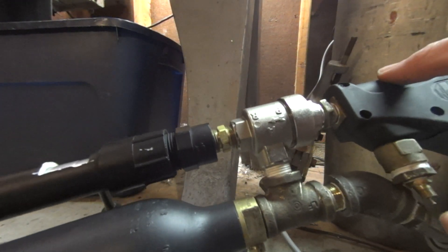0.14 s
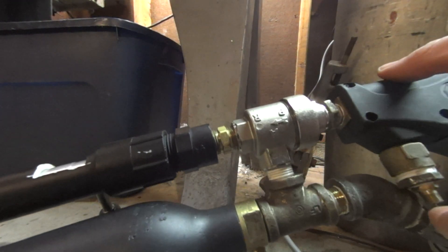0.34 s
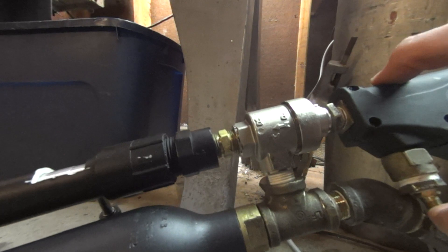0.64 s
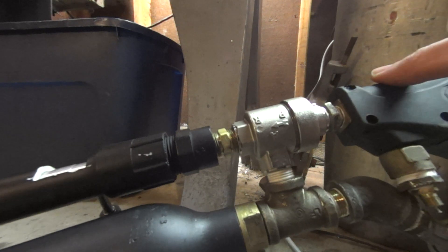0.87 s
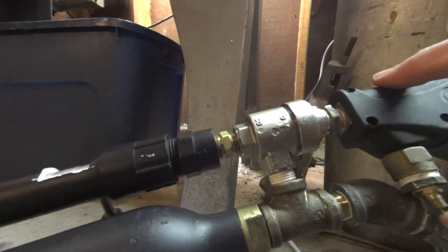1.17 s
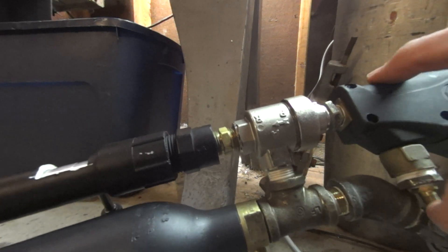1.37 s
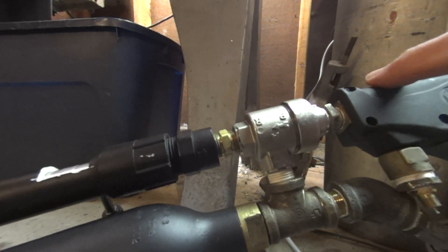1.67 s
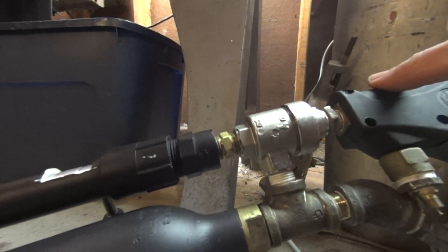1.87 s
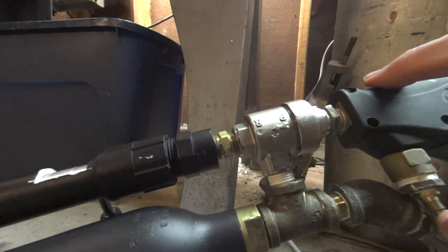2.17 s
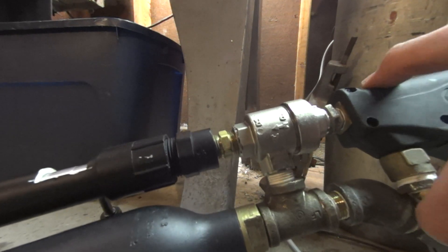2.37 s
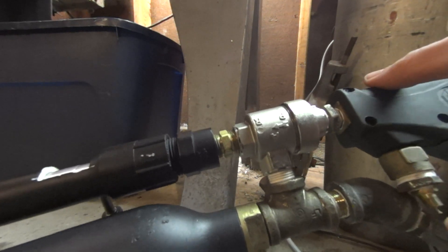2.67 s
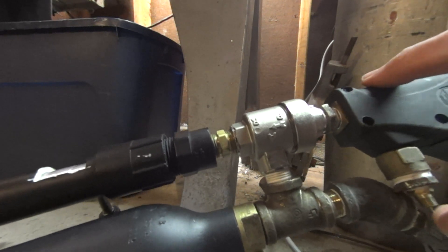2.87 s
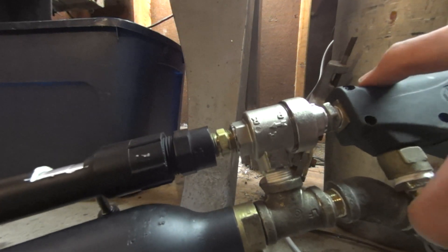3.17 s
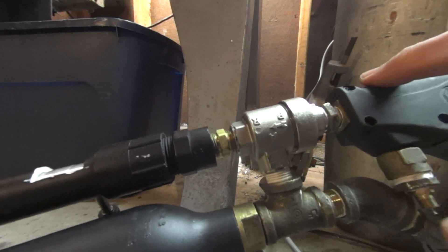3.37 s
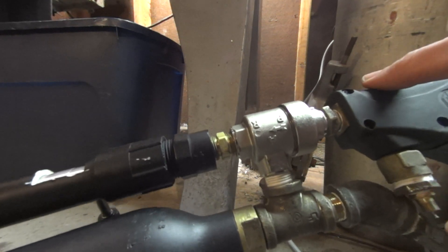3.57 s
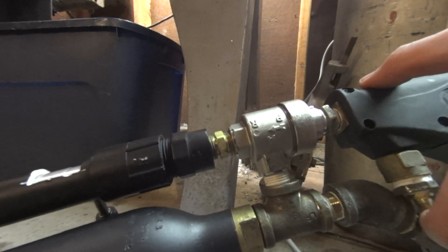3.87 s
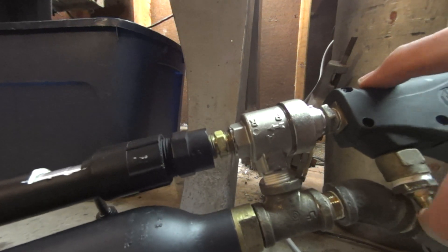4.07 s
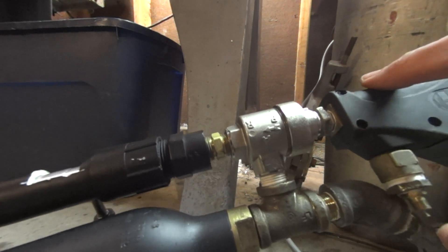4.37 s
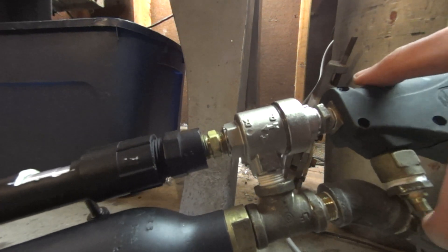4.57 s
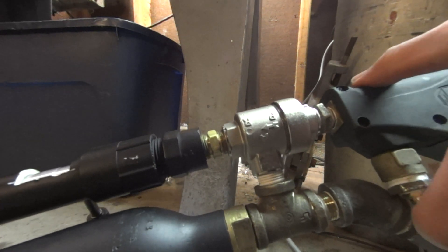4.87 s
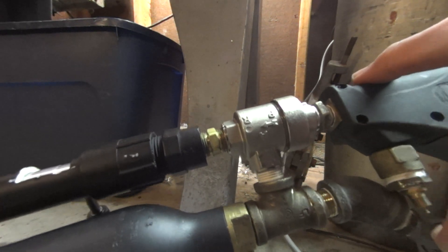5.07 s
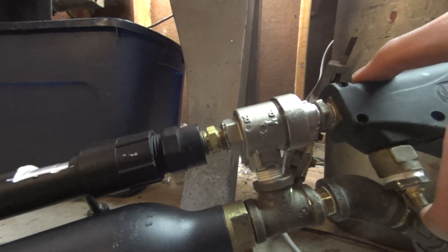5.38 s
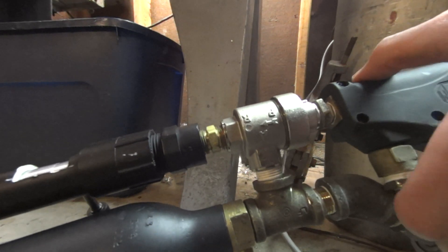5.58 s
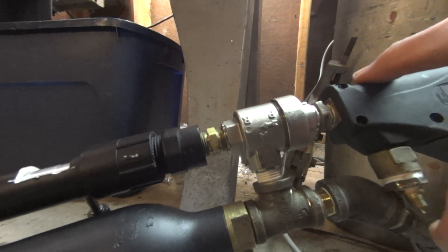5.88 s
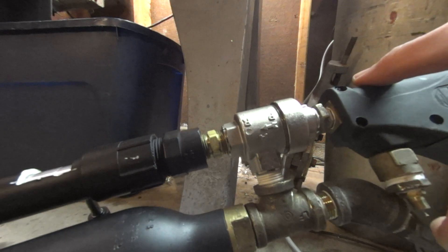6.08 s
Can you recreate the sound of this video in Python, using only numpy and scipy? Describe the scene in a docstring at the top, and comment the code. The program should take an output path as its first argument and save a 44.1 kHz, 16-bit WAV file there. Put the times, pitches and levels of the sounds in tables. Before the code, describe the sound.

Close up in a quiet, small workshop, an air gun made of pipe and a valve lets out eight hard blasts at a steady pace. A tiny spit of air from the trigger leads into each crack, which trails off in hiss and a brief boomy ring from the room. About half a second after each shot but the last, a softer puff escapes, with light plastic ticks from the handle here and there.

```python
"""Air rifle in a small workshop

A homemade air rifle is dry-fired eight times, close to a stereo microphone. Each time the trigger
spits, the valve pops and the barrel lets out one sharp blast; a limiter flattens the ringing room
into a burst of hiss. On release the trigger vents a short puff, and the plastic handle ticks."""
import sys
import numpy as np
from scipy import signal
from scipy.fft import rfft, irfft
from scipy.io import wavfile
from scipy.ndimage import uniform_filter1d

SR = 44100
rng = np.random.default_rng(int(sys.argv[2]) if len(sys.argv) > 2 else 0)


def wav_record(signal):
    """Record a signal, one row per channel, as 16-bit PCM in the file named by sys.argv[1]."""
    frames = np.transpose(np.atleast_2d(signal))
    bounded = np.clip(frames, -1, 1)
    # unit amplitude maps onto the largest positive 16-bit level
    quanta = np.round(bounded * 32767).astype(np.int16)
    wavfile.write(sys.argv[1], SR, quanta)


N = 274743
BAND_LIMIT_HZ = 11130


def gain_of(db):
    """Decibels to amplitude."""
    return 10 ** (np.asarray(db) / 20)


def curve_at(points, hz):
    """Joins (Hz, value) points on a log-frequency axis."""
    f, value = np.transpose(points)
    return np.interp(np.log(hz + 1), np.log(f + 1), value)


def pan(db):
    """Channel gains that put the left db above the right."""
    return gain_of([[db / 2], [-db / 2]])


def add(mix, s, sound):
    """Mixes a sound in at s seconds."""
    part = mix[:, max(round(s * SR), 0):][:, :sound.shape[-1]]
    part += sound[..., :part.shape[1]]


def white_pair(size, likeness):
    """White noise in two channels, correlated by likeness."""
    a, b = rng.standard_normal((2, size))
    return np.array([a, likeness * a + np.sqrt(1 - likeness ** 2) * b])


def hiss(spectrum, size, likeness, tilt_db=0):
    """Stereo noise of a given spectrum, tilted by tilt_db an octave above 1500 Hz; rms 1."""
    hz = np.fft.rfftfreq(size, 1 / SR)
    octaves = np.log2(np.maximum(hz / 1500, 1))
    colour = gain_of(curve_at(spectrum, hz) + tilt_db * octaves) * (hz < BAND_LIMIT_HZ)
    noise = irfft(rfft(white_pair(size, likeness)) * colour, size)
    return noise / np.sqrt(np.mean(noise ** 2) + 1e-20)


def puff(t, rise, length):
    """Flow through a port that opens quickly and runs out of pressure."""
    return (1 - np.exp(-np.maximum(t, 0) / rise)) * np.exp(-(t / length) ** 2)


# The quiet workshop. Each row: frequency in Hz, relative level in dB.
ROOM_TONE_SPECTRUM = [(15, -60.5), (25, -16.5), (169, -6), (505, -15), (635, -17), (778, -16.5),
                      (1140, -19.5), (1510, -18.5), (2780, -24.5), (3240, -26), (11000, -34.5),
                      (14300, -75.5), (22000, -120)]


def room_tone():
    """Faint, steady low noise all around the microphone."""
    return gain_of(-57) * hiss(ROOM_TONE_SPECTRUM, N, likeness=0.32) * pan(db=2.5)


# Diffuse sound off the walls. Each row: band centre in Hz, relative level in dB, t60 in seconds,
# build-up in seconds, left over right in dB, left-right correlation.
REVERB_BANDS = [(71.6, 10.5, 0.64, 0.027, 0, 0.58), (147, 5, 0.63, 0.082, 9.5, 0.7),
                (285, -1.5, 0.59, 0.0098, 14.5, 0.62), (626, 7.5, 0.51, 0.018, 6.5, 0.27),
                (1074, 4.5, 0.52, 0.0043, 7.5, 0.54), (2540, 6, 0.53, 0.0028, 4.5, 0.4),
                (4520, 10.5, 0.44, 0.0089, 2, 0.73), (7860, 8, 0.35, 0.0051, 1.2, 0.61),
                (10500, 7.5, 0.28, 0.018, 1, 0.85)]
# Standing waves of the workshop. Each row: frequency in Hz, relative level in dB, t60 in seconds.
STANDING_WAVES = [(73, -25.5, 1.5), (126.6, -20, 0.87), (157.9, -18.5, 0.79), (188.5, -16.5, 0.75),
                  (220.4, -15.5, 0.4), (237.3, -20, 0.29), (252.8, -18, 0.45), (287.1, -24.5, 0.74),
                  (308, -17, 0.47), (325.4, -31, 0.66), (360.7, -16, 0.49), (397, -28.5, 0.53)]


def workshop(swell_s=0.045, boom_s=0.099, boom_hz=280, boom_width_s=0.027, boom_db=3):
    """Room response: each band builds and dies at its own pace; the bass gathers into a rising boom."""
    t, hz = np.arange(SR) / SR, np.fft.rfftfreq(SR, 1 / SR)
    centres, tail = [row[0] for row in REVERB_BANDS], np.zeros((2, SR))
    for own_band, (_, db, t60, build, lean_db, likeness) in zip(np.eye(len(centres)), REVERB_BANDS):
        band_shape = np.sqrt(curve_at(np.c_[centres, own_band], hz))
        band = irfft(rfft(white_pair(SR, likeness)) * band_shape, SR)
        tail += band * pan(lean_db) * gain_of(db - 60 * t / t60) * (1 - np.exp(-t / build))
    channel_phase = np.array([[0], [.55]])
    for f, db, t60 in STANDING_WAVES:
        # the lowest standing waves peak first, so the boom slides upward
        boom = gain_of(boom_db) * np.exp(-((t - boom_s * f / boom_hz) / boom_width_s) ** 2)
        swell = (1 - np.exp(-(t / swell_s) ** 2)) * (1 + boom)
        wave = np.sin(2 * np.pi * (f * t + rng.random()) + channel_phase)
        tail += pan(db=4) * swell * gain_of(db - 3 - 60 * t / t60) * wave
    return gain_of(-36) * tail


# Tone of the dry little ticks of the handle and trigger. Each row: frequency in Hz, relative level in dB.
TICK_SPECTRUM = [(240, -33.5), (400, -1.5), (1160, 2), (4110, -6), (5980, 2.5), (7260, -5), (8220, 2.5),
                 (8810, -3), (11000, -3.5), (14300, -53), (22000, -120)]
# Ticks of the handle, and a few of the trigger taking up slack just before it spits. Each row: start in
# seconds, peak level in dB before panning.
SMALL_TICKS = [(0.006, -34.5), (1.759, -38), (2.598, -44), (2.636, -34.5), (3.444, -45.5), (3.484, -45),
               (4.244, -40), (4.268, -44), (5.059, -47), (5.096, -34.5), (5.164, -45), (5.908, -44),
               (5.955, -33.5), (5.993, -38.5)]


def small_ticks(decay_s=0.0046):
    """Dry little knocks of the handle under the finger and of the trigger taking up slack, close and a little
    to the right."""
    t, out = np.arange(SR // 16) / SR, np.zeros((2, N))
    for s, db in SMALL_TICKS:
        knock = np.exp(-t / decay_s) * hiss(TICK_SPECTRUM, len(t), likeness=0.81)
        add(out, s, gain_of(db) * knock / abs(knock).max() * pan(db=-2.5))
    return out


# Air through the opening trigger. Each row: frequency in Hz, relative level in dB.
SPIT_SPECTRUM = [(120, -39), (200, -31.5), (1240, 3), (2520, -3), (4840, 0), (6220, -3.5), (6990, 0.5),
                 (8130, -8.5), (11000, -15), (14300, -37), (22000, -120)]
# Spits as the trigger is pressed. Each row: start in seconds, level in dB.
TRIGGER_SPITS = [(.116, -48), (.126, -27.5), (1.029, -29), (1.877, -35), (2.739, -37.5), (3.565, -38.5),
                 (3.582, -41), (4.334, -35.5), (5.18, -43), (5.186, -42.5), (6.014, -39), (6.02, -44)]


def trigger_spits(spit_s=0.0052):
    """Right by the microphone, the trigger opens with a brief spit of air and a faint leak."""
    t, out = np.arange(SR // 10) / SR, np.zeros((2, N))
    leak = gain_of(-23) * puff(t, rise=.003, length=0.028)
    flow = puff(t, spit_s, spit_s) + leak
    for s, db in TRIGGER_SPITS:
        air = hiss(SPIT_SPECTRUM, len(t), likeness=0.74, tilt_db=-0.9)
        add(out, s, gain_of(db) * flow / flow.max() * air * pan(db=-1.5))
    return out


# Air escaping from the trigger or the valve. Each row: frequency in Hz, relative level in dB.
AIR_SPECTRUM = [(240, -29), (400, -16), (606, -19), (1340, -18.5), (1490, -23), (1860, -12), (2140, -19.5),
                (2560, -8), (4110, -6.5), (5420, 1), (6680, 3.5), (8110, 9.5), (11000, 8.5), (14300, -60),
                (22000, -120)]
# Air vented as the trigger is let go. Each row: start in seconds, level in dB, length in seconds,
# treble tilt in dB per octave.
TRIGGER_VENTS = [(.620, -17, 0.017, -5), (0.809, -41.5, 0.029, -9), (.832, -31, 0.011, -6.5),
                 (1.489, -19, 0.024, -4.5), (1.708, -36.5, 0.011, -6), (2.3617, -19.5, 0.022, -4),
                 (3.196, -20.5, 0.022, -3.5), (3.971, -21.5, 0.019, -4), (4.225, -43, 0.011, -2.5),
                 (4.797, -20.5, .021, -2.5), (5.6349, -20.5, 0.017, -4)]


def trigger_vents(lead_s=.004, snap_s=0.0028, thump_hz=160, thump_rise_s=0.0033):
    """The seal snaps, then lets go: heard close up, a bright puff with a soft low thump."""
    t, out = np.arange(SR // 8) / SR, np.zeros((2, N))
    thump_shape = t / thump_rise_s * np.exp(1 - t / thump_rise_s)
    thump = gain_of(-16) * np.sin(2 * np.pi * thump_hz * t) * thump_shape * pan(db=2.5)
    snap = gain_of(-8) * puff(t, snap_s / 2, snap_s)
    for s, db, length, tilt_db in TRIGGER_VENTS:
        flow = snap + puff(t - lead_s, rise=0.0014, length=length)
        air = flow * hiss(AIR_SPECTRUM, len(t), likeness=0.87, tilt_db=tilt_db)
        add(out, s - lead_s, gain_of(db) * (air * pan(db=-1.5) + thump))
    return out


# The eight shots. Each row: blast start in seconds, piston pop in dB, valve open time in seconds.
FIRINGS = [(0.146, -0.5, .25), (1.0502, -1.5, 0.26), (1.9048, 0, .25), (2.7674, -1, 0.26), (3.599, 2, 0.24),
           (4.3695, 0.5, 0.25), (5.2095, 2, .23), (6.042, 0.5, .23)]


def valve(lead_s=0.0036, pop_hz=560, pop_decay_s=0.00024, low_cut_hz=160):
    """The piston pops just ahead of each blast; air streams through and flares as the valve seats."""
    t, out = np.arange(SR // 3) / SR, np.zeros((2, N))
    pop = gain_of(-1.5) * np.sin(2 * np.pi * pop_hz * t) * np.exp(-t / pop_decay_s) * pan(db=6.5)
    pop = signal.lfilter(*signal.butter(1, low_cut_hz, "high", fs=SR), pop)
    # a faint hiss swells just ahead of the pop, softening its attack
    swell = gain_of(-41.5) * puff(t, rise=.004, length=.006)
    crack = gain_of(-24.5) * puff(t, rise=.0003, length=0.0036)
    stream = gain_of(-46.5) * puff(t, rise=0.0074, length=.6)
    for s, pop_db, open_s in FIRINGS:
        opening = 1 / (1 + np.exp(np.minimum((t - open_s) / .003, 50)))
        seating = gain_of(-43.5) * np.exp(-((t - open_s) / 0.0068) ** 2)
        flow = gain_of(pop_db) * crack + stream * opening + seating
        add(out, s - 2 * lead_s, swell * hiss(AIR_SPECTRUM, len(t), likeness=0.47))
        add(out, s - lead_s, gain_of(pop_db) * pop + flow * hiss(AIR_SPECTRUM, len(t), likeness=0.42))
    return out


# The blast at the muzzle. Each row: frequency in Hz, relative level in dB.
MUZZLE_SPECTRUM = [(24, -47), (40, -32), (98, -15.5), (250, -4), (309, -2), (450, -11), (583, -9.5),
                   (656, -10), (849, -5.5), (1460, -6.5), (1720, -6.5), (2560, -7), (4200, -8.5),
                   (11000, -10.5), (14300, -33), (22000, -120)]
# Resonances of the barrel and its fittings. Each row: frequency in Hz, added ring in dB.
BARREL_RESONANCES = [(820, -5.5), (1027, -9), (1209, 0.5), (1656, 3.5), (1836, 4), (1984, 1), (2041, 0.5),
                     (2239, -1), (2421, -11), (2598, -14), (2830, -17), (3069, -0.5), (3428, -15),
                     (3654, -5.5), (4080, 4.5), (4267, -14.5), (4786, -13.5), (4910, 2), (5526, -9),
                     (5603, 2)]


def barrel(size=8192, width_hz=55):
    """Pressure pulse at the muzzle, ringing at the resonances of the pipe."""
    hz = abs(np.fft.fftfreq(size, 1 / SR))
    ring = sum(gain_of(db) ** 2 / (1 + (2 * (f - hz) / width_hz) ** 2) for f, db in BARREL_RESONANCES)
    gain = np.maximum(gain_of(curve_at(MUZZLE_SPECTRUM, hz)) * np.sqrt(1 + ring), 1e-4)
    minimum_phase = np.exp(np.conj(signal.hilbert(np.log(gain))))  # nothing rings ahead of the pulse
    pulse = np.fft.ifft(minimum_phase).real[:size // 2]
    return pulse / np.linalg.norm(pulse)


# First paths to the microphone, direct and off the bench. Each row: delay in seconds, level in dB.
FIRST_ARRIVALS = [(0, -11), (.0015, -12.5)]


def muzzle_blasts(room, blast_db=28, jet_low_hz=4000, jet_decay_s=0.023, front_band_hz=(600, 4500)):
    """The same pressure pulse every shot, followed by a jet whose treble turbulence is always new."""
    t, muzzle = np.arange(SR // 6) / SR, np.zeros((1, N))
    impulse, rounded = 1. * (t == 0), np.exp(-t / 0.0007)
    puff_sag_db_per_s, jet_sag_db_per_s = 2.5, 1.9  # both weaken from shot to shot
    # at each vent the last low pressure leaves the barrel as a soft puff
    for s, db, *_ in TRIGGER_VENTS:
        add(muzzle, s, gain_of(db) ** 2 * gain_of(43 - puff_sag_db_per_s * s) * rounded / rounded.sum())
    jet_filter = signal.butter(1, jet_low_hz, "high", fs=SR)
    for s, *_ in FIRINGS:
        jet = signal.lfilter(*jet_filter, rng.standard_normal(len(t))) * np.exp(-t / jet_decay_s)
        jet *= gain_of(-0.5 - jet_sag_db_per_s * s) / np.linalg.norm(jet)
        add(muzzle, s, gain_of(blast_db) * (impulse + jet))
    # behind the muzzle the front arrives rounded, with a short scatter off the nearby pipework
    front = signal.lfilter(*signal.butter(2, front_band_hz, "band", fs=SR), impulse)
    scatter = gain_of(-12) * np.exp(-t / 0.0017) * white_pair(len(t), likeness=0.19)
    paths = room.copy()
    for delay, db in FIRST_ARRIVALS:
        add(paths, delay, gain_of(db) * (front + scatter) * pan(db=6))
    ringing = signal.fftconvolve(muzzle, barrel()[None])[:, :N]
    return signal.fftconvolve(ringing, paths, axes=1)[:, :N]


def scene():
    """The muzzle points into the room; the valve and trigger sit right by the microphone."""
    room = workshop()
    near = valve() + trigger_spits() + trigger_vents() + small_ticks()
    reverb = gain_of(-13.5) * signal.fftconvolve(near, room, axes=1)[:, :N]
    return room_tone() + reverb + near + muzzle_blasts(room)


def record(dry, limit_db=-15, recovery_db_per_s=220):
    """A fast limiter holds each blast level until the room dies down; then clipping and a low-pass."""
    power = uniform_filter1d((dry ** 2).mean(0), size=220)
    power_db = 10 * np.log10(abs(power) + 1e-12)
    recovery_db = np.arange(N) * recovery_db_per_s / SR
    peak_db = np.maximum.accumulate(power_db + recovery_db) - recovery_db
    over_db = np.maximum(peak_db - limit_db, 0)
    limited = dry / gain_of(uniform_filter1d(over_db, size=60))
    clipped = np.clip(limited, -.88, .88)
    low_pass = signal.firwin(601, BAND_LIMIT_HZ, window=("kaiser", 8), fs=SR)
    return signal.oaconvolve(clipped, low_pass[None], "same")


dry = scene()
out = record(dry)
wav_record(out)
```